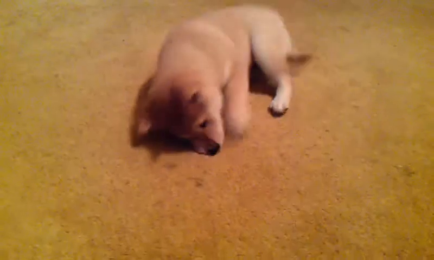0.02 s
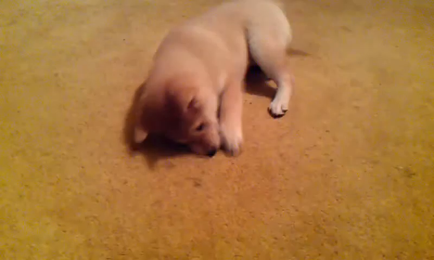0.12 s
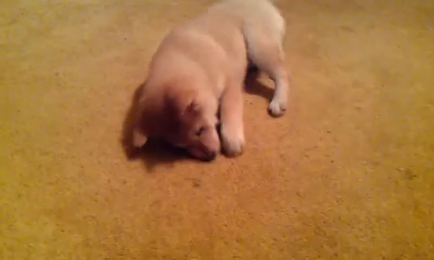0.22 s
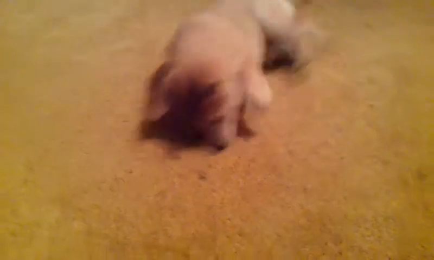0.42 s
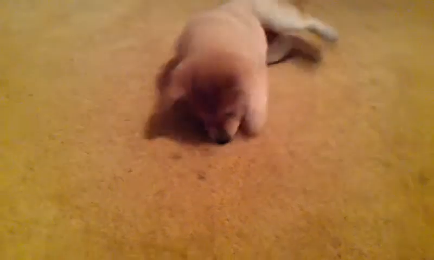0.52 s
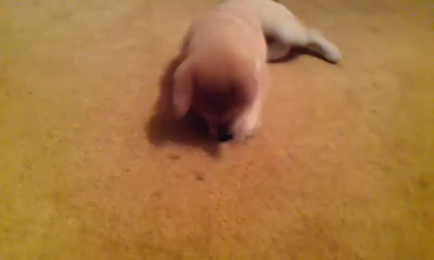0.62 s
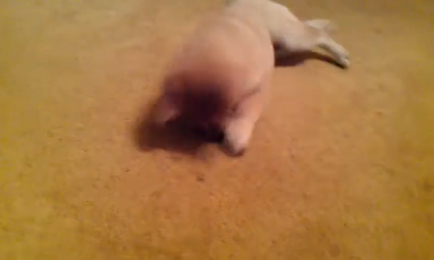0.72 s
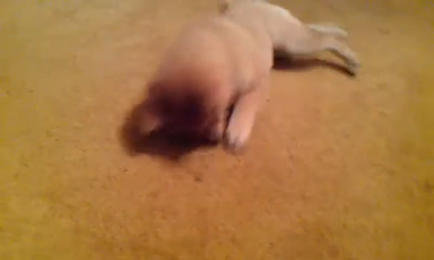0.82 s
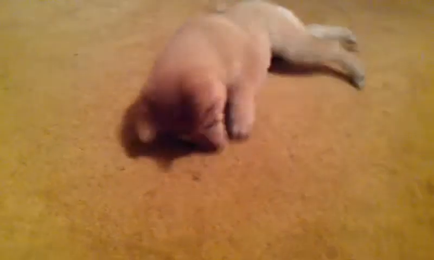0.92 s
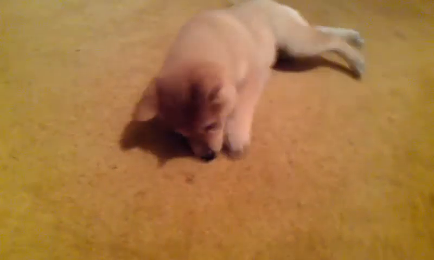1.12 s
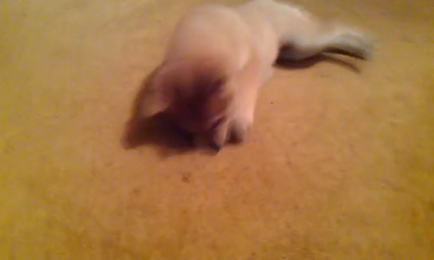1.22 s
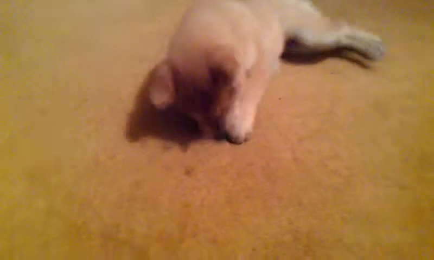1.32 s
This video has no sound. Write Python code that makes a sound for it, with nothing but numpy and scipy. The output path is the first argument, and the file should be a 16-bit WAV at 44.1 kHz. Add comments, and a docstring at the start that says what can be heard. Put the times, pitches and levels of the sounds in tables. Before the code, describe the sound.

A puppy's claws scratch at carpet and tear free with a crack, then fur rustles softly.

```python
"""A puppy's claws drag over a carpet, close to the microphone in a quiet room.
They catch and release the loops ever harder, plucking the carpet's backing, until they tear
free with a crack and a thump. Then its fur rustles over the pile (the carpet's soft top),
its legs bump the floor and a claw ticks a few times, over a faint, steady hiss."""
import sys
import numpy as np
from scipy import signal
from scipy.fft import rfft, irfft, next_fast_len
from scipy.io import wavfile

SR = 44100
rng = np.random.default_rng(int(sys.argv[2]) if len(sys.argv) > 2 else 0)


def materialize(psi):
    """Save the field psi as 16-bit PCM at rate SR to the path in sys.argv[1].

    A 1-D psi becomes a single channel; in a 2-D psi each row is a channel.
    """
    bounded = np.clip(np.atleast_2d(psi).T, -1, 1)
    quanta = np.round(bounded * 32767).astype(np.int16)
    wavfile.write(sys.argv[1], SR, quanta)


N = 61739


def amp(db):
    """Turn decibels into a number to multiply by."""
    return 10 ** (np.asarray(db) / 20)


def unit(x):
    """Scale a sound so its average strength (rms) is 1."""
    return x / np.sqrt(np.mean(x ** 2) + 1e-20)


def peaked(x):
    """Scale a sound so its highest peak is 1."""
    return x / np.abs(x).max()


def level(points):
    """Join (time_s, level_db) points into a volume curve."""
    return amp(np.interp(np.arange(N) / SR, *np.transpose(points)))


def swell_and_fade(t, rise_s, fade_s):
    """A volume curve that rises quickly and dies away by 60 dB every fade_s."""
    return (1 - np.exp(-t / rise_s)) * amp(-60 * t / fade_s)


def add(out, start_s, sound):
    """Mix a sound in at the given time."""
    i = max(int(round(start_s * SR)), 0)
    out[i:i + len(sound)] += sound[:len(out) - i]


def ring(colour, size=4096):
    """A click with a given colour: how strong each frequency is, from low to high."""
    hz, db = np.transpose(colour)
    f = np.fft.rfftfreq(size, 1 / SR)
    gain = amp(np.interp(np.log(f + 1), np.log(hz), db))
    # these steps pack the sound at the start of the click and keep its colour
    cepstrum = irfft(np.log(gain))
    cepstrum[1:size // 2] *= 2
    cepstrum[size // 2 + 1:] = 0
    return peaked(irfft(np.exp(rfft(cepstrum))))


def resonance(hz, width_hz, top_hz, order=1, size=2048):
    """A soft knock around one pitch: wider dies sooner, and a lower top_hz sounds duller."""
    f = np.fft.rfftfreq(size, 1 / SR)
    band = 1j * f * width_hz / (hz * hz - f * f + 1j * f * width_hz)
    return peaked(irfft(band ** order / (1 + 1j * f / top_hz)))


def coloured(x, colour):
    """Give a sound a colour, at an average strength of 1."""
    return unit(signal.fftconvolve(x, ring(colour))[:N])


def grains(per_s, spread_db):
    """Tiny clicks of uneven size at random times."""
    happens = rng.random(N) < per_s / SR
    size = amp(spread_db * np.clip(rng.standard_normal(N), -2, 2))
    sign = rng.choice([-1, 1], N)
    return unit(happens * sign * size)


def background_hiss():
    """The faint, steady noise of a quiet room."""
    # colour of the hiss: frequency_hz, level_db
    hiss_colour = [(15, -38), (25, -10), (193, -0.5), (297, -1), (378, -4.5), (762, -1.5), (2010, -5.5),
                   (2230, -7.5), (2560, -6), (4750, -6), (7300, -5.5), (8350, -9), (15500, -8.5)]
    return amp(-65) * coloured(rng.standard_normal(N), hiss_colour)


def room_echo(sound):
    """A furnished room answers with a faint, short echo."""
    t = np.arange(SR // 3) / SR
    tail = rng.standard_normal(len(t)) * swell_and_fade(t, rise_s=0.0043, fade_s=0.23)
    return amp(-39) * signal.fftconvolve(sound, tail / np.linalg.norm(tail))[:N]


def body_rub():
    """The body rubs on the carpet with a dull, grainy sound."""
    # loudness of the rubbing: time_s, level_db
    rub_levels = [(0, -70.5), (.09, -63.5), (.18, -68.5), (.25, -59), (.305, -42), (.325, -62), (.365, -61),
                  (.39, -63.5), (.5, -70.5), (.66, -67), (.73, -72), (.78, -65.5), (.88, -66.5),
                  (.93, -61.5), (.99, -60.5), (1.09, -73), (1.14, -58.5), (1.18, -66), (1.22, -59),
                  (1.28, -70), (1.4, -71)]
    # colour of the rubbing: frequency_hz, level_db
    rub_colour = [(25, -14), (70, -1), (150, -1.5), (280, -1), (600, -3.5), (1100, -9), (2500, -12),
                  (5000, -22.5), (12000, -43)]
    return level(rub_levels) * coloured(grains(per_s=2500, spread_db=4), rub_colour)


def fur_rustle():
    """Fur slides over the pile with a fine hiss."""
    # loudness of the sliding fur: time_s, level_db
    fur_levels = [(0, -71.5), (.2, -58), (.375, -52.5), (.4, -58), (.442, -52), (.486, -69), (.58, -78),
                  (.615, -65), (.668, -59), (.74, -65), (.79, -62), (.89, -63.5), (.91, -58), (.99, -60),
                  (1.04, -65.5), (1.09, -71), (1.2, -61.5), (1.28, -69.5), (1.4, -69.5)]
    # colour of the sliding fur: frequency_hz, level_db
    fur_colour = [(300, -22.5), (1500, -16.5), (4000, -10.5), (6000, -5.5), (7400, 1.5), (8500, -8),
                  (10000, -12.5), (15500, -24)]
    return level(fur_levels) * coloured(grains(per_s=9000, spread_db=6), fur_colour)


def claw_ticks():
    """A claw touches down lightly as the puppy shifts."""
    # claw touches: start_s, level_db, pitch_hz, width_hz
    touches = [(.7765, -50, 1000, 1400), (1.1265, -42.5, 4000, 700), (1.1263, -39.5, 5890, 900),
               (1.1349, -36.5, 1130, 1510), (1.154, -44.5, 1100, 1500), (1.203, -45.5, 1590, 2600),
               (1.2119, -41.5, 1380, 2600)]
    out = np.zeros(N)
    for start_s, level_db, pitch_hz, width_hz in touches:
        add(out, start_s, amp(level_db) * resonance(pitch_hz, width_hz, top_hz=9000, order=2))
    return out


def floor_bumps():
    """Paw and legs hit the carpeted floor with soft thuds that die quickly."""
    # thuds: start_s, level_db, pitch_hz, fade_s
    thuds = [(.038, -47, 151, 0.032), (.079, -49.5, 140, 0.033), (.108, -54, 120, .04),
             (0.146, -54.5, 45, .08), (0.345, -36.5, 107, 0.024), (.364, -37, 72, 0.039),
             (.648, -61, 62.3, .1), (.692, -55.5, 62, 0.13), (.908, -45, 564, 0.017),
             (.9288, -40.5, 545, .018), (.931, -51, 290, 0.06), (0.919, -56, 68, 0.23),
             (1.02, -60, 66, .08), (1.118, -54, 194, 0.048), (1.125, -53, 65.5, 0.17),
             (1.195, -56.5, 190, 0.047), (1.221, -64, 66, .08)]
    out = np.zeros(N)
    t = np.arange(SR // 3) / SR
    for start_s, level_db, pitch_hz, fade_s in thuds:
        volume = amp(level_db) * swell_and_fade(t, rise_s=0.13 / pitch_hz, fade_s=fade_s)
        add(out, start_s, volume * np.sin(2 * np.pi * pitch_hz * t))
    return out


def snap(colour, chatter_db, size=512):
    """A loop lets go sharply, and the fibres next to it flick in a short chatter."""
    t = np.arange(size) / SR
    push = rng.standard_normal(size) * swell_and_fade(t, rise_s=0.00032, fade_s=0.005)
    push *= amp(chatter_db) / np.linalg.norm(push)
    push[0] = 1  # the release itself
    return np.convolve(push, ring(colour))


def claw_drag():
    """Claws comb through the pile, snap its loops and pluck the backing."""
    # loudness of the dragging paw: time_s, level_db
    drag_levels = [(0, -59.5), (.07, -61), (.16, -56.5), (.21, -50.5), (.25, -42), (.287, -38.5),
                   (.296, -49.5), (.322, -49), (.34, -48.5), (.35, -37.5), (.364, -45.5), (.372, -79),
                   (.4, -75)]
    # colour of the combed pile: frequency_hz, level_db
    pile_colour = [(120, -49.5), (200, -13.5), (253, -8), (874, -4), (1170, -11.5), (1510, -4.5),
                   (3420, -8), (6710, -2.5), (9480, -9.5), (14200, -17.5), (15500, -24)]
    # loops slipping off the claws: start_s, level_db
    loop_snaps = [(.054, -38.5), (0.0871, -34), (0.0917, -36.5), (0.0978, -37), (0.1264, -30.5),
                  (0.1307, -36.5), (.1446, -34.5), (0.1595, -32.5), (.171, -36), (0.174, -36),
                  (0.1797, -27.5), (0.1973, -30), (0.2056, -28.5), (0.2178, -33), (0.2254, -33),
                  (0.236, -30), (.2472, -19.5), (0.2531, -22), (.2603, -23.5), (0.2644, -21.5),
                  (0.2709, -17.5), (0.2757, -29), (.2829, -19.5), (0.2896, -25), (0.307, -28),
                  (0.3168, -24.5), (0.3287, -29), (.3336, -23), (0.3449, -30), (0.3467, -20.5),
                  (0.3479, -11.5), (.9095, -38), (0.9274, -42), (0.9413, -40), (0.949, -40), (.98, -34),
                  (1.029, -44)]
    # colour of a snapping loop: frequency_hz, level_db
    snap_colour = [(100, -7.5), (500, -9.5), (1200, -11), (2500, -4), (4200, -8), (6500, 5), (7800, 1),
                   (10000, -14.5), (13000, -10.5), (16000, -14)]
    # the lifted backing springs back: start_s, level_db, pitch_hz
    plucks = [(0.0872, -44.5, 790), (0.1263, -37.5, 1800), (0.1589, -43, 1400), (0.1801, -42.5, 1000),
              (0.2113, -38, 800), (0.2383, -29.5, 1010), (.2652, -25, 780), (.271, -29, 1200),
              (.2772, -22, 885), (.2835, -24.5, 726), (0.285, -27.5, 700), (0.2898, -19, 790),
              (.304, -26.5, 620), (0.3058, -15, 383), (0.3333, -33.5, 590), (.3487, -19.5, 1500)]
    out = level(drag_levels) * coloured(grains(per_s=1500, spread_db=6), pile_colour)
    for start_s, level_db in loop_snaps:
        add(out, start_s, amp(level_db) * snap(snap_colour, chatter_db=-3.5))
    for start_s, level_db, pitch_hz in plucks:
        pluck = resonance(pitch_hz, width_hz=1.24 * pitch_hz, top_hz=1800)
        add(out, start_s, amp(level_db) * pluck)
    return out


def claws_tear_free():
    """The claws come loose with a loud crack, and the carpet falls back with a thump."""
    # colour of the crack: frequency_hz, level_db
    crack_colour = [(100, -24), (800, -28.5), (1500, -1), (2500, -6.5), (4200, -6.5), (5200, 1), (6300, 0),
                    (7500, -5.5), (8500, -1), (10800, -20), (13500, -14.5), (16000, -25)]
    crack_s, thump_delay_s = 0.3625, 0.00044
    out = np.zeros(N)
    add(out, crack_s, amp(-3) * snap(crack_colour, chatter_db=-12))
    add(out, crack_s + thump_delay_s, amp(-24.5) * resonance(hz=166, width_hz=216, top_hz=447))
    return out


def scene():
    """Mix the puppy, its echo and the hiss into one channel."""
    puppy = claw_drag() + claws_tear_free() + floor_bumps() + claw_ticks() + fur_rustle() + body_rub()
    return (background_hiss() + room_echo(puppy) + puppy)[None]


def record(dry):
    """The small microphone loses the deep bass and the very highest treble."""
    low_cut_hz, top_hz = 38, 15850
    size = next_fast_len(N + SR // 2)
    f = np.fft.rfftfreq(size, 1 / SR)
    s = 1j * f / low_cut_hz
    bass_cut = s * s / (s * s + s + 1)
    return irfft(rfft(dry, size) * bass_cut * (f < top_hz), size)[..., :N]


dry = scene()
out = record(dry)
materialize(out)
```